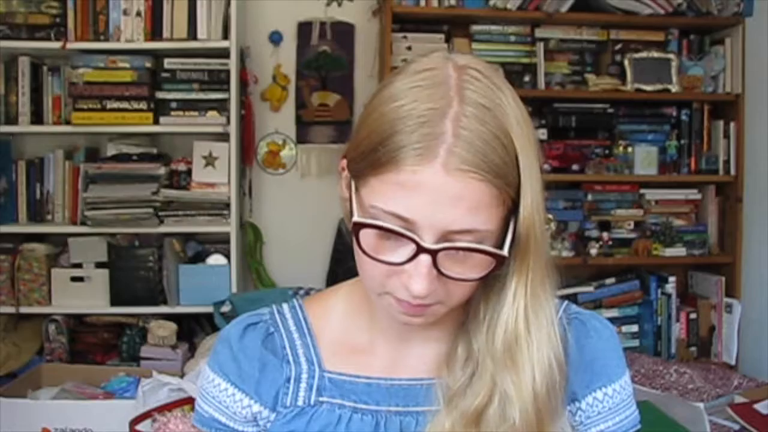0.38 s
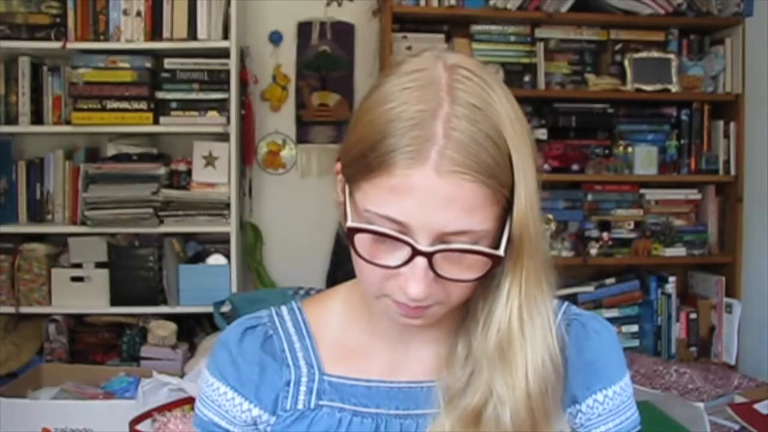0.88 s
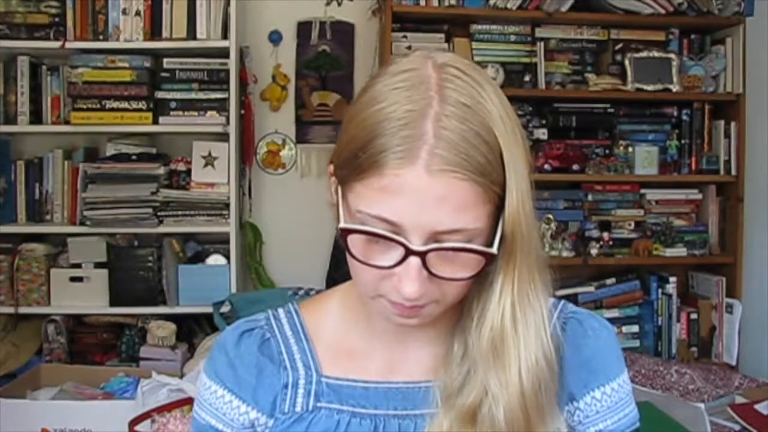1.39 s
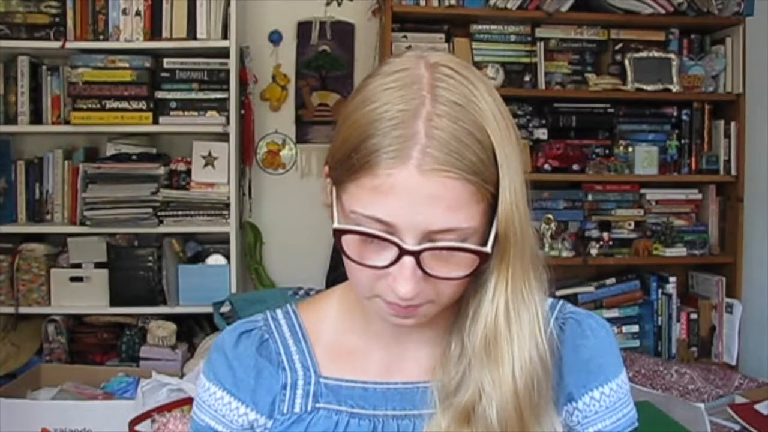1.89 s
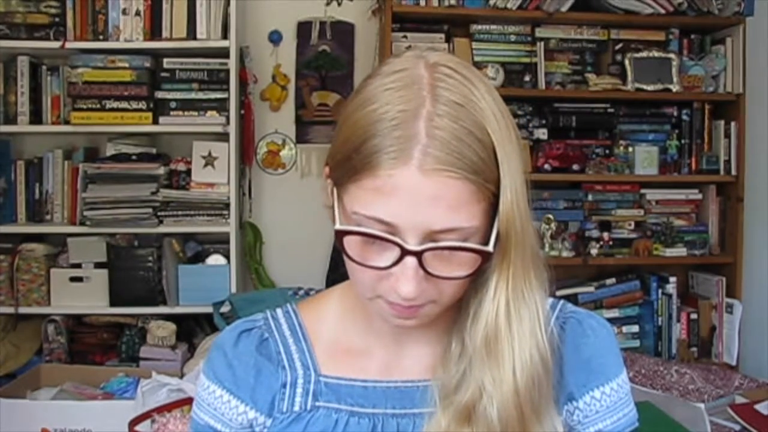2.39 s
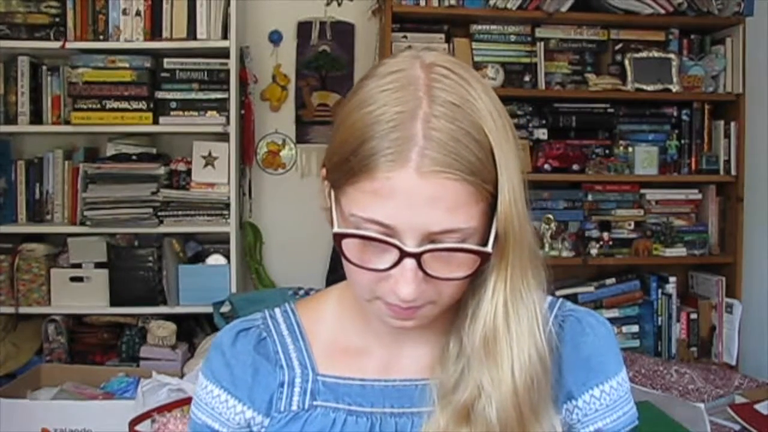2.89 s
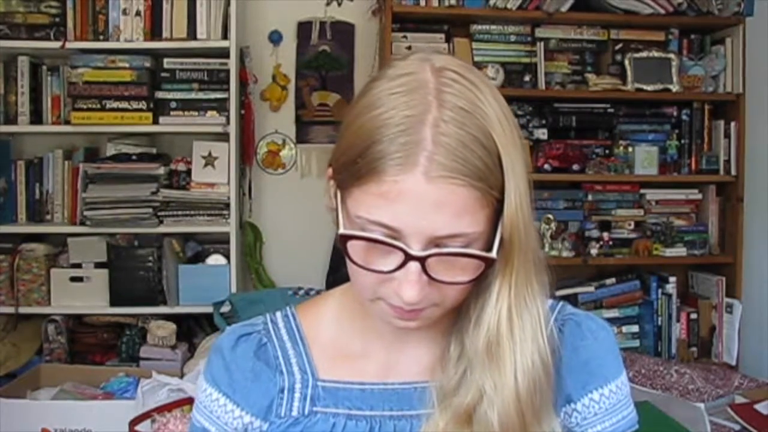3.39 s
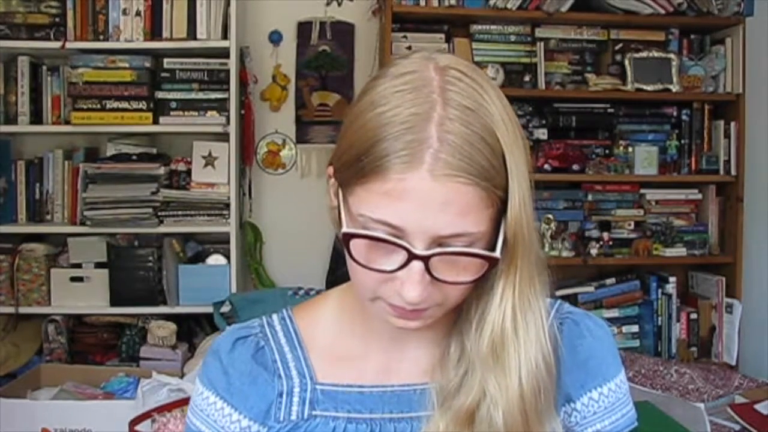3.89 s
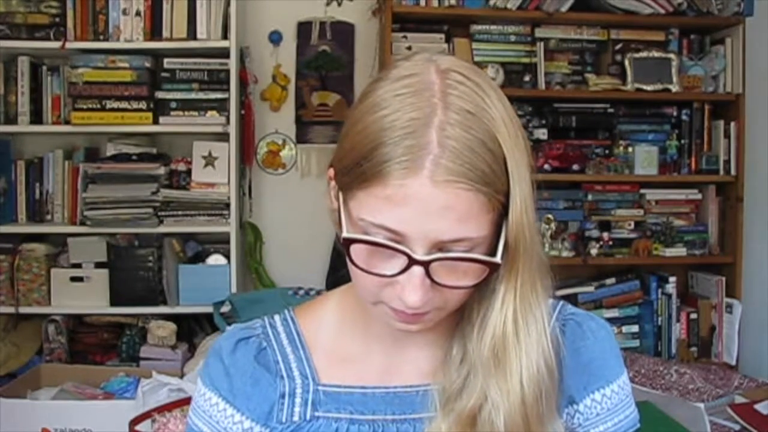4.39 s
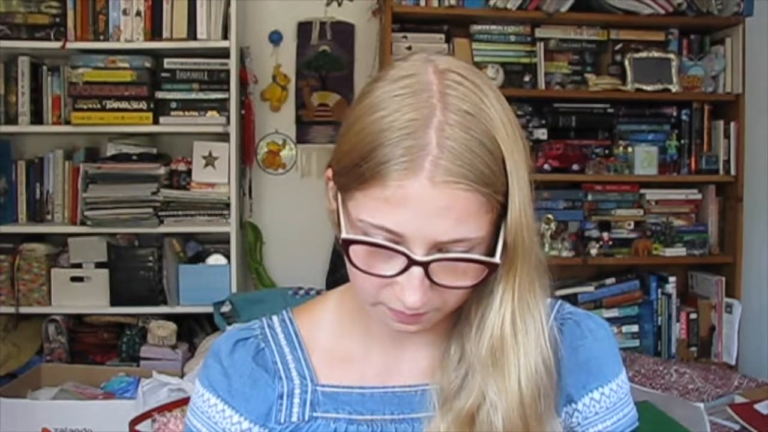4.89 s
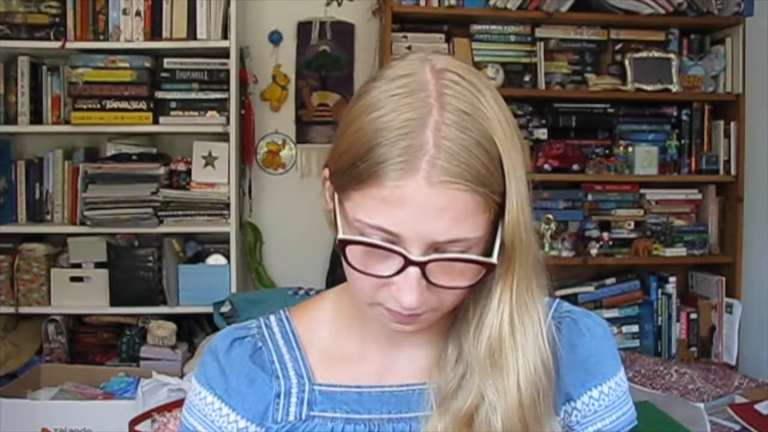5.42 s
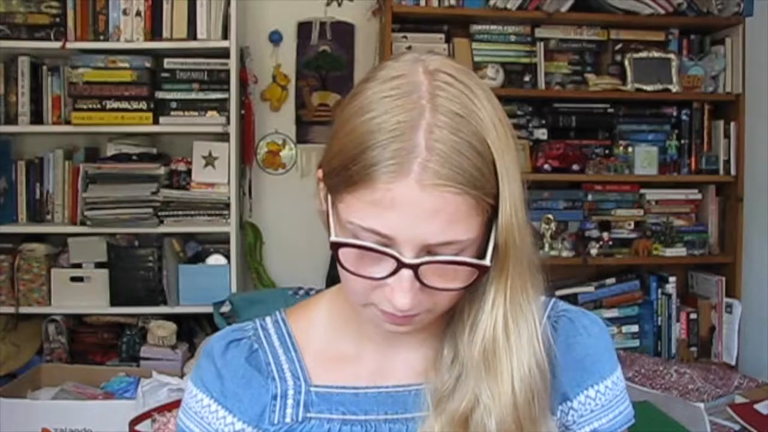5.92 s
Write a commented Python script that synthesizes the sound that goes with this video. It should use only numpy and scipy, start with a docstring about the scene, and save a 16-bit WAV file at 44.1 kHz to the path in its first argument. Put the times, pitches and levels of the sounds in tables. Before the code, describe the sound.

Close stereo sound of sticker picking: sharp nail snaps on a book's stiff cover, irregular in timing and strength, the loudest around the middle of the first three seconds onward. Between them, dry fingertip slides and muffled board taps. Then a short gritty tear, and only faint crackling glue and small scrapes, thinning to near silence. Short indoor reflections, low steady room hum, thin microphone hiss, no talking.

```python
"""Sharp snaps of a fingernail picking at a price sticker on a book cover are heard first, close by in a small room.
Each snap is an impulse response of the book's modes, with a bounce off the hand and a deep thump.
Between picks, dense random slips excite the same modes as the finger slides and the glue crackles;
short noise bursts make gritty tears, and paired decaying sines make dull ticks of the cover board.
Behind them, shaped noise gives a faint room hum and camera hiss, and narrow-band tones a hum and a thin whine."""
import sys
import numpy as np
from scipy import signal
from scipy.fft import rfft, irfft, next_fast_len
from scipy.io import wavfile
from scipy.ndimage import uniform_filter1d

SR = 44100
rng = np.random.default_rng(int(sys.argv[2]) if len(sys.argv) > 2 else 0)


def boost(x):
    """Linear amplitude factor 10**(x/20) for a level x in decibels (scalar or array-like)."""
    u = np.asarray(x, float) / 20
    return 10 ** u


def generate_wav(signal):
    """Clip the signal to [-1, 1] and save it as 16-bit WAV at the path in sys.argv[1]."""
    frames = np.transpose(np.atleast_2d(signal))
    scaled = np.clip(frames, -1, 1) * 32767
    pcm = np.round(scaled).astype(np.int16)
    wavfile.write(sys.argv[1], SR, pcm)


N = 266187  # length in samples

# Nail snaps. Each row: start in seconds, force in dB, then against the paper click:
# weight on the book in dB, nail edge in dB, film tick in dB.
NAIL_SNAPS = [(0.1357, -16.5, -11.5, 1, 0), (0.1555, -8.5, -12, 1, -14.5), (0.3199, -26, -9, -1, -4),
              (0.427, -47, 1, 10, 0), (0.8953, -7.5, -10, -4.5, -7), (1.003, -35, -10, 8, -17),
              (1.0363, -38, -2, 12, 5), (1.3007, -6, -6, 8, -8), (1.3825, -31.5, -3, 6, -5),
              (1.4793, -34, -8, -2, 4), (1.706, -6.5, -3.5, 8, -11.5), (1.8693, -29.5, -9, 3, -4),
              (1.8863, -28.5, -15, 10.5, 1), (2.0828, -10, -5.5, 3.5, -8.5), (2.2465, -18, -12, 0, -6),
              (2.3734, -37, -11, 7, -1), (2.4178, -1, -7.5, 6.5, -14), (2.595, -25, -8.5, 4, -9),
              (2.6113, -29, -13, 5, 4), (2.7816, -0.5, -9, 9.5, -10), (2.9227, -19.5, -25, -8, -17),
              (2.9705, -8, -25, 5, 3), (3.1319, -31, -8, 3, -3), (3.1454, -26, -4.5, -2, -5),
              (3.2635, -34, -21, -5, -4), (3.3175, -21, -31, -12, -17), (3.498, -16.5, -33, -4, -4),
              (3.553, -27, -24, 3.5, -6), (3.7194, -40, 5, 9, 13), (4.4305, -36.5, -22, -8, 14.5),
              (4.515, -38.5, -3.5, 11, 18), (4.777, -48, -14, -16, 24.5), (4.8226, -42.5, 3.5, -6, 6)]
# Modes of book, sticker and nail. Each row: frequency in Hz, width in Hz, level in dB.
BOOK_MODES = [(378, 55, 19), (577, 126, 17), (973, 40, 16.5), (1330, 540, 14), (1680, 390, 5),
              (2550, 400, 5.5), (3300, 820, -4), (4000, 1600, -4.5), (4900, 480, -0.5), (5700, 360, -3),
              (6850, 1260, 1), (9500, 4100, 1.5), (12300, 1300, -32.5)]
# Centres in Hz of the knock, tap, click, nail edge, film tick and highest treble.
SNAP_ZONES_HZ = (500, 1200, 2400, 5000, 10000, 16000)
KNOCK_DB, TOP_DB = -2.5, -7.5  # deep knock against the cover tap; highest treble against the film tick
# The whole book gives a little under each snap; the level is against force plus weight.
THUMP_HZ, THUMP_DB, THUMP_MS = 238, -45, 4.5
# Each snap lands elsewhere: random draws scale this share of mode frequency and this unevenness.
SHIFT, UNEVEN_DB = 0.044, 0.5
# The cupped hand throws each snap back at once, which notches its treble.
BOUNCE_MS, BOUNCE_SPREAD_MS, BOUNCE_DB = 0.596, 0.082, -5.5

# Finger slides, swelling and fading. Each row: loudest moment in seconds, scrape in dB, fade in ms,
# then against the scrape: cover rumble in dB, glue crackle in dB. A common stroke gain follows.
FINGER_SLIDES = [(0.5, -54, 60, -6.5, -6), (0.598, -58.5, 35, -1, -16), (0.725, -56.5, 130, -5.5, -9.5),
                 (0.865, -57.5, 60, -3, -0.5), (1.03, -58.5, 60, 1.5, -10), (1.168, -61.5, 80, -5, -7),
                 (1.255, -59.5, 50, 0, -8), (1.511, -52, 65, -3, -6), (1.668, -57, 50, -6, -14),
                 (1.886, -57.5, 50, 2.5, -7), (2.055, -52.5, 70.5, -3, -13), (2.27, -54.5, 59.6, -15, -5.5),
                 (2.395, -61, 80, -11, -4), (2.74, -61, 60, -10, -2), (3.06, -59.5, 80, -7, -14),
                 (3.11, -58.5, 60, 2, -8), (3.22, -62.5, 90, 3, -11), (3.33, -52.5, 70, -26, -1),
                 (3.42, -57, 80, -4, -16), (3.493, -53, 48.7, -18, -2), (3.636, -64, 50, 3, -10),
                 (3.93, -55.5, 80, -4, -0.5), (4.202, -68, 60, 6, -15), (4.36, -61.5, 80, -11, -2),
                 (4.47, -74, 50, 8, -12), (4.556, -54, 45, -22, 4.5), (4.609, -56.5, 60, -1, 6),
                 (4.99, -62.5, 89, -8, 9), (6.02, -51, 131, -2, -24)]
# Glue letting go suddenly, then dying. Each row: loudest moment in seconds, crackle in dB, fade in ms,
# scrape in dB against the crackle. The same stroke gain follows.
GLUE_PEELS = [(2.6, -59.5, 160, 3.5), (3.145, -53, 120, 6.5), (3.266, -53.5, 400, 0.5),
              (3.47, -53, 130, 0.5), (3.535, -60, 64, 6), (3.719, -58, 180, 3), (4.215, -60, 78, -5),
              (4.432, -65, 39, 6), (4.516, -59, 41, 1), (4.782, -54.5, 140, -1.5), (4.826, -46.5, 39, -5),
              (4.96, -56, 82, -4), (5.19, -48.5, 71, -2)]
# Colours of the three stroke layers. Each row: frequency in Hz, gain in dB.
SCRAPE_COLOUR = [(900, -23), (1900, -4.5), (4000, 9.5), (6500, 3.5), (10000, -4)]
RUMBLE_COLOUR = [(200, -35), (350, 5.5), (1000, -3.5), (1600, 3.5), (2500, -21)]
CRACKLE_COLOUR = [(4500, -47), (7500, 8), (10000, 12), (13000, 15.5), (16000, 8)]
FADE_DB = -18  # drop over one fade or rise time
SWELL, GRAB_MS = 1, 26  # rise of a slide as a share of its fade; rise of a peel
PEEL_RUMBLE_DB = -19  # rumble of a peel against its crackle

# Gritty tears as the sticker lifts. Each row: start in seconds, peak in dB, ringing frequency in Hz,
# width in Hz, length in ms.
STICKER_TEARS = [(0.881, -41.5, 4430, 3000, 6), (3.341, -29, 3300, 2170, 13),
                 (3.342, -29, 4900, 1210, 12.2), (3.351, -28, 2550, 950, 0.91),
                 (3.506, -30.5, 4000, 940, 12.4), (3.505, -32, 9500, 3000, 2.8)]
# Dull ticks of the cover board under the fingers. Each row: start in seconds,
# level in dB before a common cut, ringing frequency in Hz.
COVER_TICKS = [(0.594, -44, 1430), (1.002, -64, 970), (1.252, -51, 1190), (1.453, -47.5, 1410),
               (1.554, -51, 1010), (1.643, -45.5, 1380), (1.841, -52, 1060), (2.053, -51, 1030),
               (2.329, -48, 1440), (2.555, -48, 1360), (3.41, -51, 1170), (3.632, -45.5, 1396),
               (3.655, -58, 1410), (3.943, -49, 1130), (4.124, -49.5, 1150), (4.395, -51, 1100),
               (4.926, -50, 1480), (5.597, -48.5, 1420), (5.622, -57, 1430), (5.796, -49.5, 1410)]

# Decay of the room. Each row: frequency in Hz, 60 dB decay time in seconds.
ROOM_DECAY = [(250, 0.05), (660, 0.18), (1740, 0.17), (4590, 0.15), (12100, 0.17)]
# Echoes from hand, lap, chest, desk and walls. Each row: delay in seconds, level in dB.
NEAR_ECHOES = [(.0009, -14), (.0019, -30.5), (.0038, -22.5), (.0062, -20), (.0125, -22), (.0178, -12)]
# The book lies off centre. Each row: frequency in Hz, left over right in dB.
SIDE_BALANCE = [(60, 4), (240, 0.5), (950, 1.5), (3770, -3.5), (15000, 2.5)]

# Spectrum of room hum and camera hiss. Each row: frequency in Hz, relative density in dB per Hz.
AIR_SPECTRUM = [(24, -30), (40, -7), (167, -4), (204, -15.5), (231, -3.5), (372, -2.5), (615, -6.5),
                (680, -3), (1150, -4.5), (1810, -9), (2050, -8), (7000, -14), (8130, -14.5), (8770, -15),
                (16000, -24.5)]
AIR_DB = -59  # rms level of that noise
# Left-right likeness of that noise. Each row: frequency in Hz, correlation from 0 to 1.
AIR_LIKENESS = [(60, 0.93), (180, 0.81), (550, 0.4), (1650, 0.091), (4970, 0.12), (15000, 0.047)]
# Wavering tones. Each row: frequency in Hz, width in Hz, rms level in dB.
WAVERING_TONES = [(50.3, 6.6, -80), (93.4, 23, -78), (312, 23, -80.5), (7860, 120, -77.5)]


def snaps(spread_ms=1.9, places=6):
    """Impulsive excitation and dispersion: the nail slips off, and each band leaves at its own moment."""
    out = np.zeros((places, N))
    chance = rng.uniform(-1.23, 1, (len(NAIL_SNAPS), len(BOOK_MODES), 2))
    lag_draws = rng.random((len(NAIL_SNAPS), 30))
    for k, (row, draw) in enumerate(zip(NAIL_SNAPS, lag_draws)):
        s, db, weight_db, edge_db, tick_db = row
        modes = [(f * (1 + SHIFT * a), width, mode_db + UNEVEN_DB * b)
                 for (f, width, mode_db), (a, b) in zip(BOOK_MODES, chance[k])]
        zone_db = (weight_db + KNOCK_DB, weight_db, 0, edge_db, tick_db, tick_db + TOP_DB)
        ring = struck(list(zip(SNAP_ZONES_HZ, zone_db)), modes)
        size = 2 * len(ring)
        hz = np.fft.rfftfreq(size, 1 / SR)

        late = (BOUNCE_MS + BOUNCE_SPREAD_MS * chance[k, -1, 0]) / 1000
        treble = hz ** 2 / (hz ** 2 + SNAP_ZONES_HZ[2] ** 2)
        bounce = 1 + boost(BOUNCE_DB) * treble * np.exp(-2j * np.pi * hz * late)

        # summing the group delay over frequency gives the phase
        lag = np.interp(hz, np.linspace(0, SR / 2, len(draw)), draw ** 2) * spread_ms / 1000
        dispersion = np.exp(-2j * np.pi * np.cumsum(lag) * hz[1])
        spread = irfft(rfft(ring, size) * bounce * dispersion)

        ms = np.arange(len(ring)) * 1000 / SR
        thump = np.exp(-ms / THUMP_MS) * np.sin(2 * np.pi * THUMP_HZ * ms / 1000)
        thump *= boost(weight_db + THUMP_DB)
        add(out[k % places], s, boost(db) * (spread[:len(ring)] + thump))
    return out


def struck(points, modes, size=2048):
    """Modal resonance: the causal, minimum-phase response of the modes, coloured by points (Hz, dB)."""
    hz = abs(np.fft.fftfreq(size, 1 / SR))
    power = sum(boost(2 * db) / (1 + (2 * (hz - f) / width) ** 2) for f, width, db in modes)
    power = power / (1 + (385. / (hz + 1)) ** 8)  # little radiation in the bass
    log_gain = np.log(power + 1e-10) / 2 + np.log(boost(read(points, hz)))
    # the Hilbert transform of the log gain supplies the phase
    return np.fft.ifft(np.exp(np.conj(signal.hilbert(log_gain)))).real[:size // 2]


def strokes(slips_per_s=8000, spread_db=4.0, flutter_db=3.5):
    """Stick-slip friction: dense slips of uneven size ring the book as the finger drags or the glue parts."""
    chance, size, sign = rng.random((3, 3, N))
    slips = (chance < slips_per_s / SR) * boost(-spread_db * np.log(size + 0.0044)) * np.sign(sign - .5)
    flutter = evened(uniform_filter1d(rng.standard_normal((3, N)), size=500))
    slips *= boost(flutter_db * flutter)  # the grip comes and goes
    colours = SCRAPE_COLOUR, RUMBLE_COLOUR, CRACKLE_COLOUR
    layers = np.array([evened(signal.oaconvolve(x, struck(colour, BOOK_MODES))[:N])
                       for x, colour in zip(slips, colours)])

    power = 0
    for s, db, fade_ms, rumble_db, crackle_db in FINGER_SLIDES:
        layer_db = np.array([db, db + rumble_db, db + crackle_db])
        power = power + np.outer(boost(layer_db) ** 2, grip(s, SWELL * fade_ms, fade_ms))
    for s, db, fade_ms, scrape_db in GLUE_PEELS:
        layer_db = np.array([db + scrape_db, db + PEEL_RUMBLE_DB, db])
        power = power + np.outer(boost(layer_db) ** 2, grip(s, GRAB_MS, fade_ms))
    envelope = np.repeat(np.sqrt(power), 64, axis=1)[:, :N]
    return (envelope * layers).sum(0)


def grip(s, rise_ms, fade_ms):
    """Exponential growth and decay: power climbs to its top at s, then fades, both steadily in dB."""
    ms = 1000 * (np.arange(0, N, 64) / SR - s)  # one value per 64 samples
    return boost(2 * FADE_DB * np.maximum(-ms / rise_ms, ms / fade_ms))


def tears():
    """Noise excitation of a resonator: a dense run of fibres breaks and rings one patch of sticker."""
    out, t = np.zeros(N), np.arange(1000) / SR
    draws = rng.standard_normal((len(STICKER_TEARS), 1000))
    for (s, db, hz, width, ms), draw in zip(STICKER_TEARS, draws):
        u = 3000 * t / ms
        breaks = draw * abs(draw) * u * np.exp(-u)
        ring = struck([(hz / 2, -12.), (hz, 0), (hz * 2, -10.)], [(hz, width, 0)])
        sound = np.convolve(breaks, ring)
        add(out, s, boost(db) * sound / abs(sound).max())
    return out


def ticks(rise_ms=0.55, ring_ms=3.8):
    """Damped free vibration: each tick is a short, soft-edged ring of two bending modes."""
    out, ms = np.zeros(N), np.arange(2000) * 1000 / SR
    shape = (1 - np.exp(-ms / rise_ms)) * np.exp(-ms / ring_ms)
    for s, db, hz in COVER_TICKS:
        pair = np.sin(2 * np.pi * hz * ms / 1000) + 0.4 * np.sin(2 * np.pi * 0.7 * hz * ms / 1000)
        add(out, s, boost(db - 4.0) * shape * pair / shape.max())
    return out


def room(x, tail_db, early_db=0., early_ms=2.4):
    """Reverberation: near echoes and sparse taps of random sign, each band dying at its own speed."""
    size = SR // 2
    taps = np.zeros((2, size))
    at = np.arange(20, size - 20, 20) + rng.integers(0, 20, (2, (size - 21) // 20))
    signs = rng.choice([-1., 1.], at.shape)
    np.put_along_axis(taps, at, signs, 1)
    taps *= 1 + boost(early_db) * np.exp(-1000 * np.arange(size) / SR / early_ms)  # hands and lap scatter first
    hz, t, z = signal.stft(taps, SR, nperseg=256)
    z = z + np.clip(780.0 / (hz + 1), .1, 1)[:, None] * z[::-1]  # close ports hear the same bass
    t60 = np.maximum(read(ROOM_DECAY, hz), .03)[:, None]
    tail = signal.istft(z * boost(-60 * t / t60), SR, nperseg=256)[1]
    tail *= boost(tail_db) / np.linalg.norm(tail[0])
    tail[:, 0] += 1  # direct sound
    for k, (s, db) in enumerate(NEAR_ECHOES):
        tail[0, round(s * SR)] += boost(db)
        tail[1, round(s * SR) + 3 * (-1) ** k] += boost(db)  # echoes arrive from either side
    return signal.fftconvolve(x[None], tail, axes=1)[:, :N]


def lean(x, lead_us=17.0, travel_ms=0.786):
    """Level and time differences between ports: the balance varies by band, and the left port leads a little."""
    size = next_fast_len(N)
    hz = np.fft.rfftfreq(size, 1 / SR)
    half_db = read(SIDE_BALANCE, hz) / 2
    delay = travel_ms / 1000 + np.array([[0], [lead_us / 1000 ** 2]])
    turned = rfft(x, size) * boost([half_db, -half_db]) * np.exp(-2j * np.pi * hz * delay)
    return irfft(turned, size)[:, :N]


def air(patchy_db=1.4, swell_db=0.5):
    """Stationary and narrow-band noise: random spectra with drifting patches and a slow swell, plus wavering tones."""
    frames, hz = N // 256 + 5, np.fft.rfftfreq(1024, 1 / SR)
    a, b, c, d, patches = rng.standard_normal((frames, 513, 5)).T
    patches = evened(uniform_filter1d(uniform_filter1d(patches, size=14, axis=0), size=8, axis=1))
    swell = evened(uniform_filter1d(rng.standard_normal(frames), size=20))
    same = np.clip(read(AIR_LIKENESS, hz), -1, 1)[:, None]
    left = a + 1j * b
    right = same * left + np.sqrt(1 - same ** 2) * (c + 1j * d)
    z = np.array([left, right])
    z *= boost(read(AIR_SPECTRUM, hz)[:, None] + patchy_db * patches + swell_db * swell)
    z[:, 0] = 0  # no offset from zero
    out = boost(AIR_DB) * evened(signal.istft(z, nperseg=1024, noverlap=768)[1][:, :N])
    for tone_hz, width, db in WAVERING_TONES:
        r = np.exp(-np.pi * width / SR)
        noise = rng.standard_normal((N, 2)) @ [1, 1j]
        drift = signal.lfilter([1], [1, -2 * r, r * r], noise)
        carrier = np.exp(2j * np.pi * tone_hz * np.arange(N) / SR)
        out += boost(db) * evened((drift * carrier).real)
    return out


def evened(x):
    """Normalization: scales a signal to unit rms."""
    return x / np.sqrt(np.mean(x ** 2) + 1e-20)


def read(points, hz):
    """Interpolation of a spectrum: straight lines over logarithmic frequency."""
    f, value = np.transpose(points)
    return np.interp(np.log(hz + 1), np.log(f + 1), value)


def add(mix, s, sound):
    """Superposition: adds a sound to the mix from s seconds on."""
    part = mix[round(s * SR):][:len(sound)]
    part += sound[:len(part)]


def scene():
    """Superposition of the hand's sounds in the room and the steady background."""
    picks = sum(room(x, tail_db=1.5) for x in snaps())  # the hand shifts, so the echoes differ from pick to pick
    small = room(tears() + ticks(), tail_db=-1.5)
    rubbing = boost(-3.5) * room(strokes(), tail_db=-7.)
    return lean(picks + small + rubbing) + air()


def band_limit(x):
    """A steep low-pass at the top of the band."""
    return signal.sosfilt(signal.butter(12, 16570, fs=SR, output="sos"), x)


def record(dry):
    """High-pass filtering: the microphone drops the deepest bass."""
    bass_cut = signal.butter(4, 38., "high", fs=SR, output="sos")
    mix = signal.sosfilt(bass_cut, dry)
    return band_limit(mix)


dry = scene()
out = record(dry)
generate_wav(out)
```